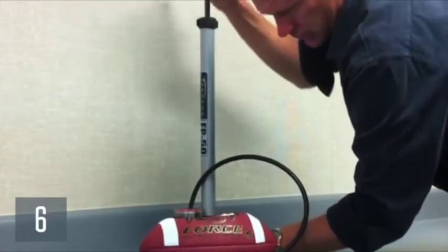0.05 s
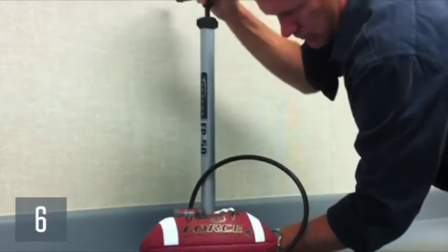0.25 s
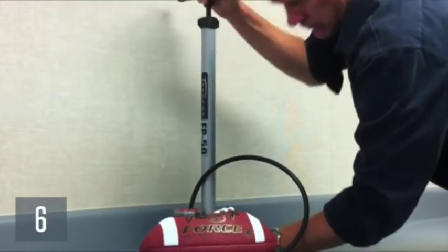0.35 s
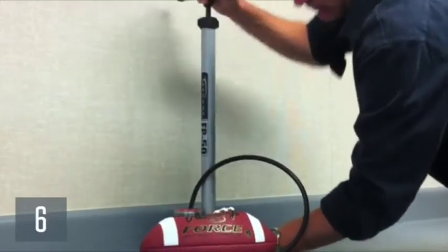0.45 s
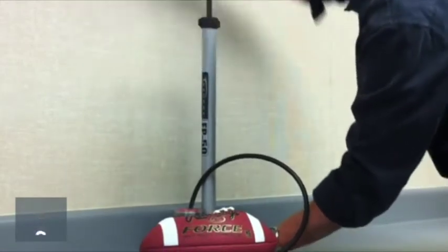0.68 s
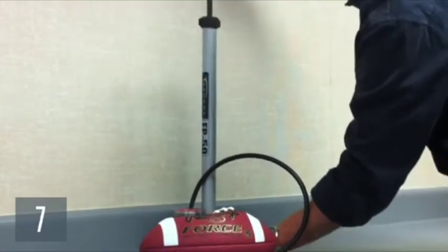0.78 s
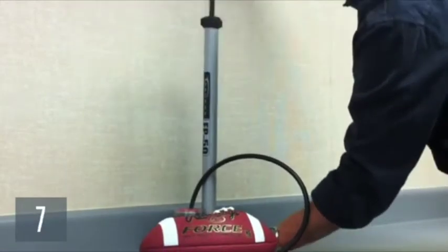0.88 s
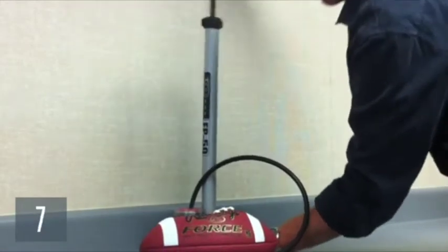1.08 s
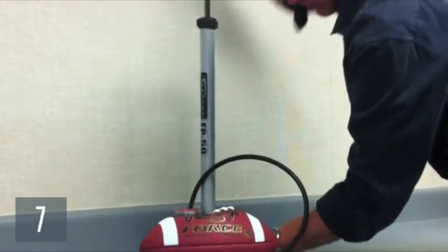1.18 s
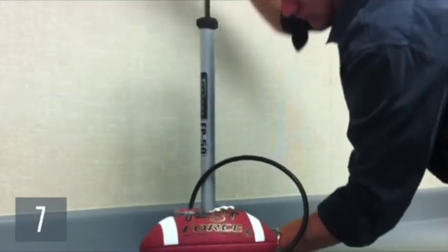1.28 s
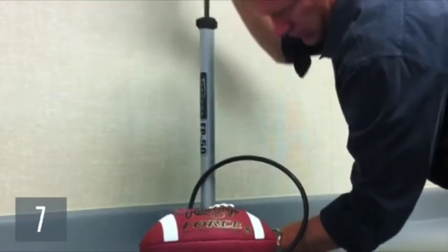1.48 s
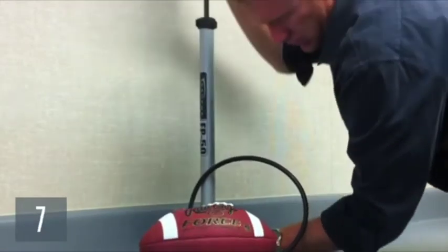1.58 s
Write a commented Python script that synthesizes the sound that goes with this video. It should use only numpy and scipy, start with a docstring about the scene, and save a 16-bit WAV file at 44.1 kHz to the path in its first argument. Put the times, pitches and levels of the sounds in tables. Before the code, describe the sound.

A hand pump knocks dully, then rubs and hisses softly through one stroke.

```python
"""One stroke of an upright hand pump on a ball, in a small room. A faint squeeze of air ends as the piston
bottoms out with a dull knock and a brief shudder (0.22 s). The handle clicks as it is pulled (0.54 s);
the seal rubs up the barrel and the rod knocks in its guide (0.76 s). From 1.1 s the piston goes down,
rubbing with a sinking groan, and squeezes air into the ball. Both ways, air hisses through the pump and
whistles thinly at the valve, and the pump rocks on its footing."""
import sys
import numpy as np
from scipy import signal
from scipy.fft import rfft, irfft, next_fast_len
from scipy.io import wavfile
from scipy.ndimage import uniform_filter1d

SR = 44100
rng = np.random.default_rng(int(sys.argv[2]) if len(sys.argv) > 2 else 0)


def store_wav(level_fs):
    """Save 16-bit WAV to argv[1]."""
    pcm = np.round(np.clip(np.atleast_2d(level_fs), -1, 1) * 32767)
    wavfile.write(sys.argv[1], SR, pcm.T.astype(np.int16))


N = 72765

# Room decay. Each row: frequency in Hz, t60 in seconds.
ROOM_T60 = [(100, 0.6), (170, 0.74), (300, 0.45), (500, 0.4), (900, 0.39), (2000, 0.51), (10000, 0.12)]
# Wall echoes. Each row: delay in seconds, gain in dB.
WALL_ECHOES = [(.013, -7.5), (.0232, -31), (0.0447, -15), (.0931, -18)]

# Noise spectra. Each row: frequency in Hz, relative level in dB.
ROOM_SPECTRUM = [(25, -14), (70, -15), (120, 2), (170, 5), (350, 3), (600, 0), (1200, -3), (1500, -2),
                 (3000, -3), (5000, -4), (8000, -6), (11000, -9), (15500, -14)]
DEEP_SPECTRUM = [(25, -10), (50, -3), (75, -4), (120, -6), (300, -40)]
HISS_SPECTRUM = [(100, 1), (700, 4), (1500, -3), (2800, 2), (4300, 1.5), (5500, 2.5), (9000, 2.5),
                 (10700, -0.5), (13000, -4.5), (15500, -5)]
TICK_SPECTRUM = [(200, -25), (800, 11.5), (2000, 3.5), (3500, -1.5), (5200, -11), (9000, -16.5),
                 (15500, -22)]
CRACK_SPECTRUM = [(100, -42.5), (500, -17), (1200, 7.5), (2000, -5.5), (4000, 0.5), (7000, -5.5),
                  (11000, -13.5), (15500, -21)]
BOOM_SPECTRUM = [(25, -43), (48, -30), (78, -44), (115, -2.5), (160, 1.5), (215, -3.5), (300, -2), (380, 1),
                 (490, -6.5), (700, -15.5), (1100, -25.5), (1600, -36.5), (4000, -45)]

# Airflow and rubbing envelopes. Each row: time in seconds, gain in dB.
HISS_ENVELOPE = [(.25, -95), (.5, -89), (.6, -66), (.76, -69), (.88, -64.5), (.97, -68), (1.055, -88),
                 (1.1, -61), (1.125, -66.5), (1.17, -57), (1.22, -55.5), (1.28, -62.5), (1.38, -64.5),
                 (1.46, -74), (1.65, -74)]
SQUEEZE_ENVELOPE = [(0, -69.5), (.2, -68), (.25, -94), (1.28, -88), (1.39, -69), (1.52, -70), (1.65, -71.5)]
PULL_ENVELOPE = [(.42, -88), (.58, -60.5), (.69, -63), (.75, -54.5), (.785, -50), (.82, -51.5), (.86, -57),
                 (.94, -61.5), (1.0, -67.5), (1.05, -75), (1.1, -75)]
PUSH_ENVELOPE = [(1.11, -80), (1.132, -51.5), (1.165, -52.5), (1.21, -47), (1.26, -52), (1.3, -53),
                 (1.335, -52.5), (1.39, -62), (1.46, -65.5), (1.54, -73), (1.65, -82)]

# Resonances driven by air and rubbing. Each row: centre in Hz, width in Hz, relative level in dB.
SQUEEZE_BANDS = [(1550, 120, 7), (2160, 240, 4), (3110, 390, -1), (3800, 2700, -5.5), (6900, 7100, -13.5),
                 (9700, 600, 2), (12900, 4400, -8)]
PULL_BANDS = [(158, 32, 3.5), (310, 130, 3.5), (382, 36, 2), (507, 125, -2.5), (722, 49, -3.5),
              (840, 74, -12)]
PUSH_BANDS = [(139, 55, -1.5), (163, 14, -1), (316, 122, -3.5), (405, 24, -8.5), (518, 35, -11),
              (760, 160, -24.5)]

# Modes of struck parts. Each row: frequency in Hz, relative level in dB, t60 in seconds.
HANDLE_MODES = [(294, -3.5, 0.12), (546, -1, 0.051), (846, -8, 0.049), (1123, -4, 0.052),
                (1620, -0.5, 0.027), (2470, 0, 0.028), (3290, 0.5, 0.025), (3526, -2, 0.025),
                (3970, -2.5, .02), (4850, -9, 0.022)]
ROD_MODES = [(323, -2, .25), (401.4, 3, 0.2), (490, -6, .3), (705.4, -1, 0.18), (783, -4.5, 0.13)]
PUMP_MODES = [(129.5, -14.5, 0.43), (161.4, -12.5, 0.31), (182.2, -21, 0.69), (283.7, 0, 0.11),
              (322, -2, 0.089), (360.4, -14.5, 0.52), (484.7, -8, 0.21), (594.6, -16.5, .22),
              (709, -6, 0.048), (899, -21.5, 0.18), (1086, -15, 0.069), (1243, -47, 0.25)]

# Deep swell. One row: peak time in seconds, sigma in seconds, level in dB.
DEEP_SWELL = (1.063, 0.03, -69.5)
# Valve whistles. Each row: centre in Hz, width in Hz, peak time in seconds, sigma in seconds, level in dB.
VALVE_WHISTLES = [(11650, 550, 0.87, .08, -73.5), (11770, 480, 1.195, 0.082, -70),
                  (11620, 420, 1.365, 0.039, -65.5), (4010, 150, 1.232, 0.021, -61),
                  (4600, 270, 1.213, 0.0087, -60), (4300, 200, 1.18, 0.033, -70),
                  (4450, 450, 1.31, 0.04, -70.5), (5570, 640, 0.63, 0.12, -73),
                  (6150, 170, 1.39, 0.027, -68.5)]
# Bumps on the footing. Each row: start in seconds, gain in dB, low mode in Hz, high mode in Hz,
# high mode's relative level in dB.
FOOTING_BUMPS = [(.565, -51, 122, 348, -21), (.712, -52, 149, 335, -13), (.775, -51, 126.6, 402, -6),
                 (.98, -54, 163, 361, -4), (1.15, -48.5, 155, 326, -6), (1.205, -48.5, 139, 399, -2.5),
                 (1.324, -44, 165.7, 306.3, -4.5), (1.465, -53, 143.2, 340, -28)]
# Rod catching in its guide. Each row: start in seconds, level in dB, t60 in seconds.
ROD_CATCHES = [(.358, -65, .04), (0.7624, -54, 0.089), (1.21, -57.5, 0.038)]
# Seal's groan. Each row: time in seconds, pitch in Hz.
GROAN_PITCH = [(1.13, 390), (1.21, 365), (1.29, 320.9), (1.37, 264.3), (1.5, 251)]

KNOCK_S, CLICK_S, GUIDE_S = .2222, .5396, .7605
TIME_S = np.arange(N) / SR


def amp(db):
    """Decibels to gain."""
    return 10 ** (np.asarray(db) / 20)


def unit(x):
    """Scale to rms 1."""
    return x / np.sqrt(np.mean(x ** 2) + 1e-20)


def along(points, hz):
    """(Hz, value) points read on a log axis."""
    points_hz, values = np.transpose(points)
    return np.interp(np.log(hz + 1), np.log(points_hz + 1), values)


def level(points):
    """Gain per sample from (s, dB) points."""
    return amp(np.interp(TIME_S, *np.transpose(points)))


def swell(peak_s, sigma_s, db):
    """Gaussian envelope."""
    return amp(db) * np.exp(-.5 * ((TIME_S - peak_s) / sigma_s) ** 2)


def since(start_s):
    """Seconds since a start, zero before it."""
    return np.maximum(TIME_S - start_s, 0)


def fade(t, t60_s):
    """Exponential decay."""
    return np.exp(-np.log(1000) * t / t60_s)


def filtered(x, response):
    """Apply a frequency response."""
    size = next_fast_len(N + SR // 2)
    return irfft(rfft(x, size) * response(np.fft.rfftfreq(size, 1 / SR)), size)[:N]


def noise(response):
    """Noise of rms 1 with the given response."""
    hz = np.fft.rfftfreq(N, 1 / SR)
    phases = np.exp(2j * np.pi * rng.random(len(hz)))
    return unit(irfft(response(hz) * phases, N))


def coloured(spectrum):
    """Noise with a (Hz, dB) spectrum."""
    return noise(lambda hz: amp(along(spectrum, hz)))


def resonant(bands):
    """Noise in steep-sided resonances."""
    return noise(lambda hz: sum(
        amp(db) * (hz * width_hz) ** 2 / ((centre_hz ** 2 - hz ** 2) ** 2 + (hz * width_hz) ** 2)
        for centre_hz, width_hz, db in bands))


def burst(start_s, spectrum, t60_s):
    """Sudden, decaying noise."""
    t = since(start_s)
    return coloured(spectrum) * (t > 0) * fade(t, t60_s)


def ring(start_s, modes):
    """Struck modes, each rising with a time constant of one cycle."""
    t = since(start_s)
    return sum(amp(db) * np.sin(2 * np.pi * hz * t) * fade(t, t60_s) * (1 - np.exp(-t * hz))
               for hz, db, t60_s in modes)


def background():
    """Steady room noise; a faint deep swell at the top of the stroke."""
    return amp(-67) * coloured(ROOM_SPECTRUM) + swell(*DEEP_SWELL) * coloured(DEEP_SPECTRUM)


def room_decay(x, start_s):
    """Each frequency dies at the room's rate from a start."""
    hz, t, spectra = signal.stft(x, SR, nperseg=1024)
    decay = fade(np.maximum(t - start_s, 0), along(ROOM_T60, hz)[:, None])
    return signal.istft(spectra * decay, SR, nperseg=1024)[1][:N]


def walls(x, cutoff_hz=500):
    """Direct sound plus dull wall echoes."""
    def response(hz):
        echoes = sum(amp(db) * np.exp(-2j * np.pi * hz * delay_s) for delay_s, db in WALL_ECHOES)
        return 1 + echoes / (1 + (hz / cutoff_hz) ** 2)
    return filtered(x, response)


def patchy_colour(x, depth_db=2.5):
    """Slow random ripple that colours the hiss unevenly."""
    spectra = signal.stft(x, SR, nperseg=1024)[2]
    patches = uniform_filter1d(rng.standard_normal(spectra.shape), size=3, axis=0)
    patches = uniform_filter1d(patches, size=16, axis=1)
    return signal.istft(spectra * amp(depth_db * unit(patches)), SR, nperseg=1024)[1][:N]


def air():
    """Flow hisses, whistles at the valve and squeezes through the needle late in a downstroke."""
    whistles = sum(swell(peak_s, sigma_s, db) * resonant([(hz, width_hz, 0)])
                   for hz, width_hz, peak_s, sigma_s, db in VALVE_WHISTLES)
    hiss = level(HISS_ENVELOPE) * coloured(HISS_SPECTRUM)
    squeeze = level(SQUEEZE_ENVELOPE) * resonant(SQUEEZE_BANDS)
    return patchy_colour(hiss + whistles + squeeze)


def low_cut(x, cutoff_hz=83):
    """Microphone-style low cut: thins the deep bass of the rubbing and bumps."""
    return signal.sosfilt(signal.butter(4, cutoff_hz, 'high', fs=SR, output='sos'), x)


def rocking(rise_s=.0025, t60_s=.27):
    """Changing effort rocks the pump on its footing: soft two-mode bumps."""
    bumps = np.zeros(N)
    for start_s, db, low_hz, high_hz, high_db in FOOTING_BUMPS:
        attack = 1 - np.exp(-since(start_s) / rise_s)
        bumps += amp(db) * attack * ring(start_s, [(low_hz, 0, t60_s), (high_hz, high_db, t60_s)])
    return bumps


def groan(sigma_hz=23.4):
    """The seal's groan: narrow noise that sinks as the downstroke slows."""
    phase = 2 * np.pi * np.cumsum(np.interp(TIME_S, *np.transpose(GROAN_PITCH))) / SR
    in_phase, quadrature = (noise(lambda hz: np.exp(-.5 * (hz / sigma_hz) ** 2)) for _ in range(2))
    return in_phase * np.cos(phase) + quadrature * np.sin(phase)


def piston():
    """The seal rubs the barrel both ways; the rod knocks hollowly in its guide going up."""
    push = level(PUSH_ENVELOPE) * (amp(-2) * resonant(PUSH_BANDS) + amp(-4.5) * groan())
    pull = level(PULL_ENVELOPE) * resonant(PULL_BANDS)
    rod_knock = amp(-48) * ring(GUIDE_S, ROD_MODES)
    return pull + push + rod_knock


def handle(reverb_db=-10.5):
    """The plastic handle takes up its play and the rod catches; both reverberate."""
    click = amp(-45) * ring(CLICK_S, HANDLE_MODES)
    tick = amp(-43.5) * burst(CLICK_S, TICK_SPECTRUM, t60_s=.043)
    catches = sum(amp(db) * burst(start_s, TICK_SPECTRUM, t60_s) for start_s, db, t60_s in ROD_CATCHES)
    direct = click + tick + catches
    tail = room_decay(rng.standard_normal(N), 0)
    reverb = signal.fftconvolve(direct, tail / np.linalg.norm(tail))[:N]
    return direct + amp(reverb_db) * reverb


def shudder(hz=167.6, rise_s=.011, hold_s=.031, release_s=.0043):
    """The barrel shudders briefly as the piston is pressed home."""
    t = since(KNOCK_S)
    attack = 1 - np.exp(-t / rise_s)
    release = (1 - np.tanh((t - hold_s) / release_s)) / 2
    return amp(-24) * attack * release * np.sin(2 * np.pi * hz * t)


def knock(thud_hz=378, thud_width_s=.002, thud_lag_s=.0017, crack_lag_s=.0011, boom_rise_s=.0062):
    """The piston bottoms out: thud and crack; pump and footing ring, floor and walls boom."""
    t = TIME_S - KNOCK_S - thud_lag_s
    thud = -amp(-18.5) * np.sin(2 * np.pi * thud_hz * t) * np.exp(-(t / thud_width_s) ** 2)
    ringing = amp(-23) * ring(KNOCK_S, PUMP_MODES)
    crack = amp(-39) * burst(KNOCK_S + crack_lag_s, CRACK_SPECTRUM, t60_s=.029)
    crack_tail = amp(-47) * burst(KNOCK_S + crack_lag_s, TICK_SPECTRUM, t60_s=.12)
    boom_attack = 1 - np.exp(-since(KNOCK_S) / boom_rise_s)
    boom = amp(-32.5) * boom_attack * room_decay(coloured(BOOM_SPECTRUM), KNOCK_S)
    return walls(thud + ringing) + crack + crack_tail + boom


def scene():
    """The pump over room noise, mono."""
    pump = knock() + shudder() + handle() + low_cut(piston() + rocking()) + air()
    return (pump + background())[None]


def record(dry):
    """Brick-wall low-pass."""
    cutoff_hz = 15750
    return filtered(dry[0], lambda hz: hz < cutoff_hz)[None]


dry = scene()
out = record(dry)
store_wav(out)
```